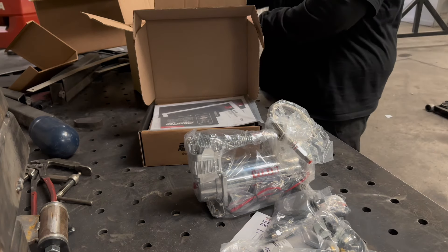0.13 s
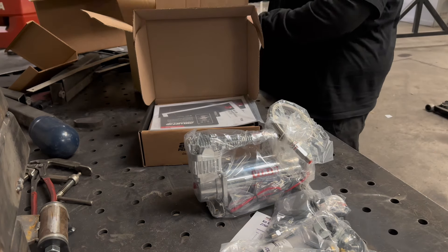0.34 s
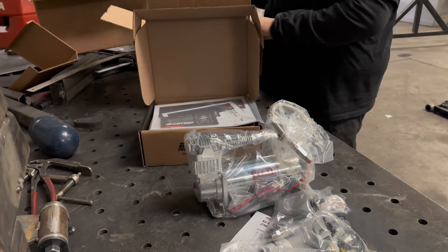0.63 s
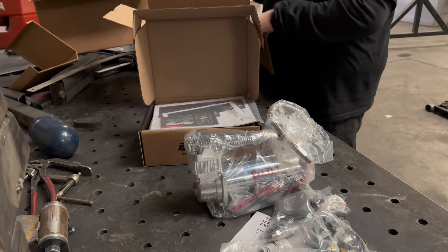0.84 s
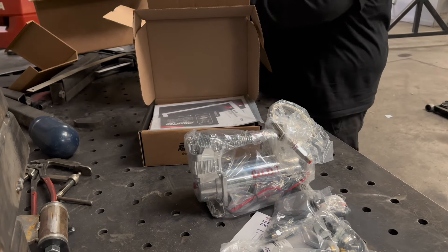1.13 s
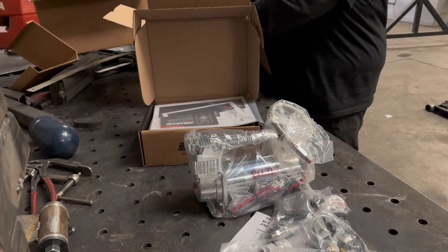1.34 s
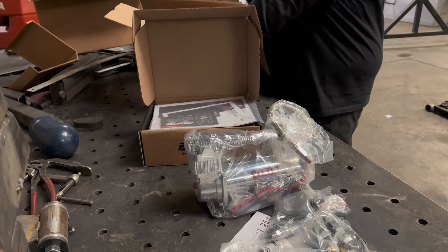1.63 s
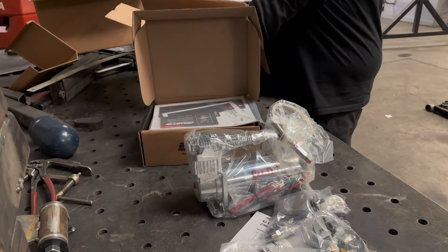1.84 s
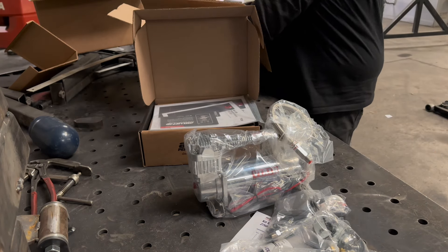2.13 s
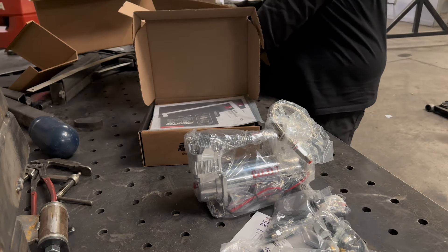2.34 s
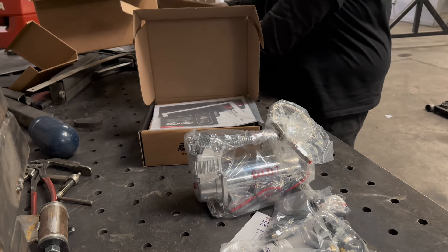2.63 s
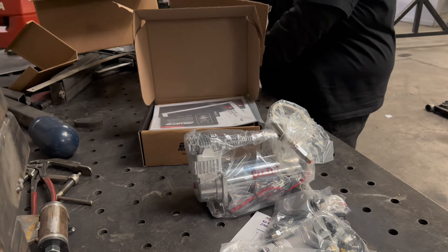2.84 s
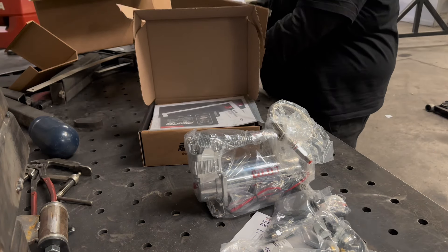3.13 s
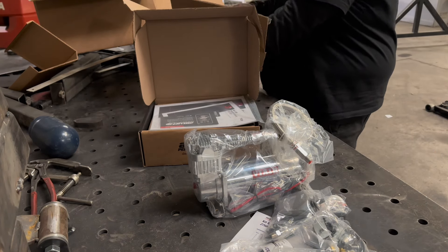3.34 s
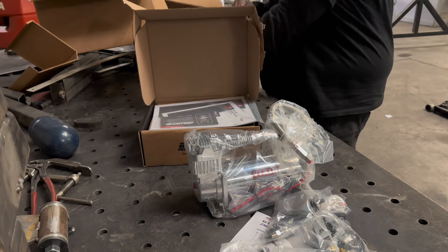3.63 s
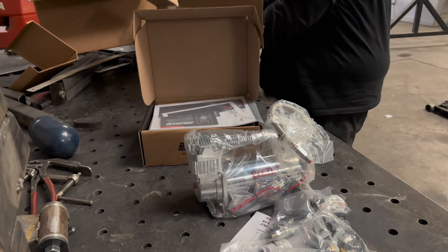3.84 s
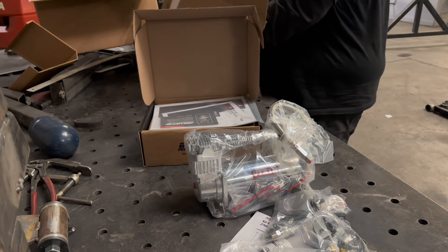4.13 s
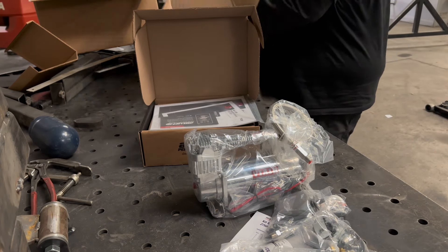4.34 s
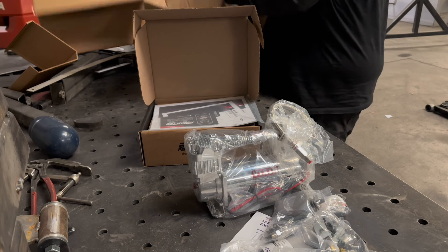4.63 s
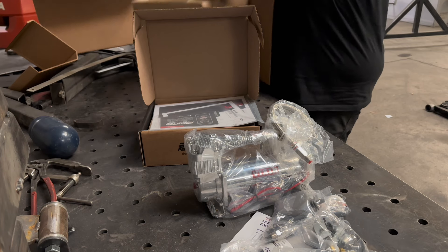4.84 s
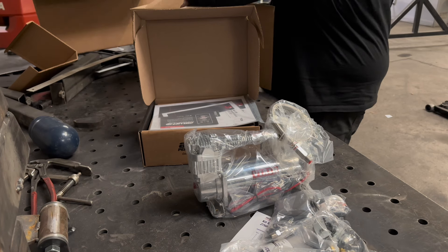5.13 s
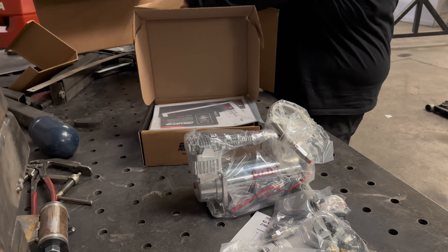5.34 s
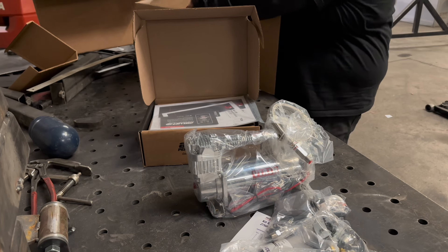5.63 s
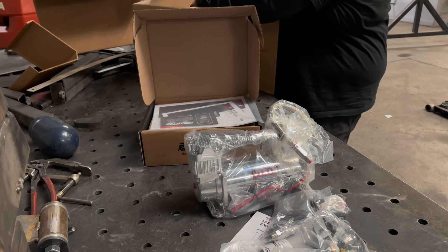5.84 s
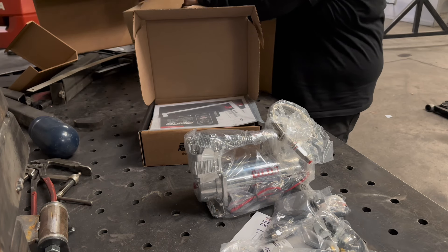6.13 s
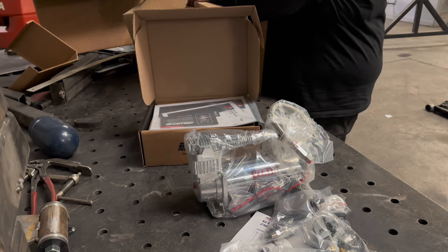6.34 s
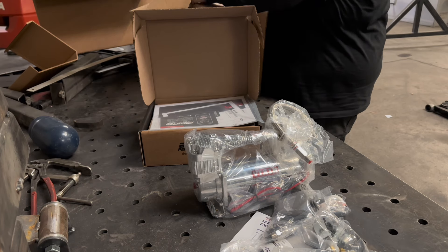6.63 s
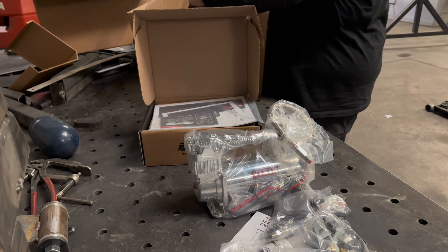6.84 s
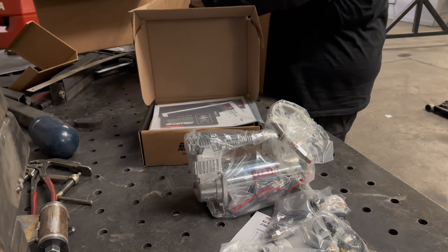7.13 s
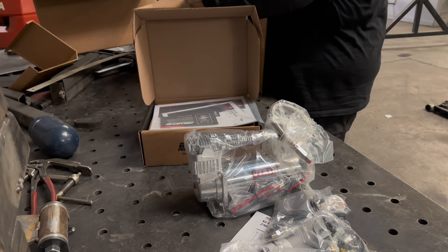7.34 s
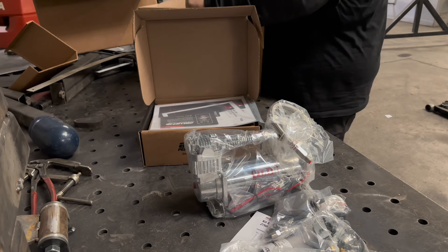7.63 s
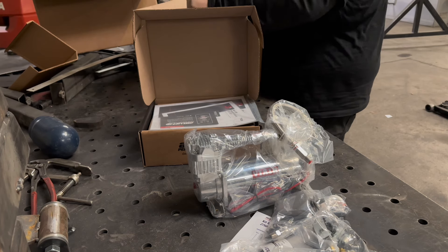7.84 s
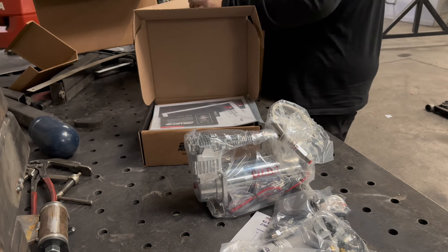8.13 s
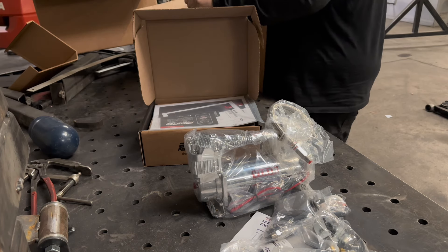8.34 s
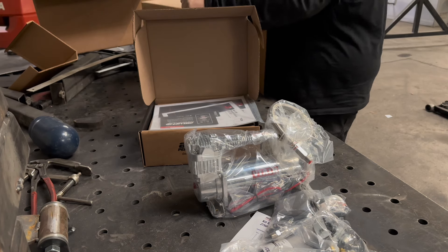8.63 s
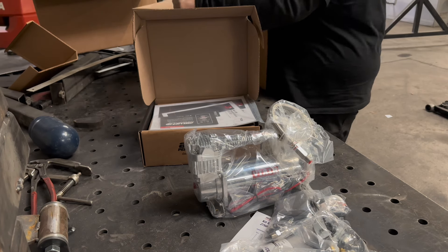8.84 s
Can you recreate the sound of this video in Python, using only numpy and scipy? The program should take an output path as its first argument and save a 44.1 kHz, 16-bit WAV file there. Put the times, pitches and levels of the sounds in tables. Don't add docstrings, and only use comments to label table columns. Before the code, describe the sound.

Cardboard cartons are knocked, rubbed and flexed while tape and creases snap and plastic film crackles, over a low steady hum in a large workshop.

```python
import sys
import numpy as np
from scipy import signal
from scipy.fft import rfft, irfft, next_fast_len
from scipy.io import wavfile
from scipy.ndimage import uniform_filter1d

SR = 44100
rng = np.random.default_rng(int(sys.argv[2]) if len(sys.argv) > 2 else 0)


def int16_out(signal):
    q = np.round(np.clip(np.atleast_2d(signal).T, -1, 1) * 32767)
    wavfile.write(sys.argv[1], SR, q.astype(np.int16))


def undo_db(level):
    steps = np.asarray(level, float) / 20
    return 10 ** steps


N = 396459

# [start_s, card_scrape_db, fade_20_db_s, film_over_card_db]
JERK_STROKES = [(0.009, -43, 0.08, 4), (.195, -40, 0.21, -0.5), (.454, -39, -0.08, -12), (.79, -63, 1, 4.5),
                (1.19, -43.5, 0.93, -6.5), (2.3, -28.5, 0.1567, -1), (2.439, -29, 0.12, 0.5),
                (3.24, -52, 0.5, -1.5), (4.166, -43.5, 0.5, -4.5), (3.639, -44, 0.13, -5.5),
                (2.0, -50, 1.5, -5), (4.522, -47, 0.5, 1.5), (4.665, -42.5, 0.2, -1),
                (4.895, -40.5, 0.25, -3.5), (5.205, -60.5, 0, 9.5), (5.377, -45.5, 1, -13),
                (5.934, -24, 0.02, 3.5), (5.978, -26.5, 0.06, -3), (6.114, -38.5, 0.18, 0),
                (6.32, -46, .8, -9.5), (6.8, -52, 0.2, -19), (7.2, -49, -3, -11), (7.235, -36, 0.26, -1),
                (7.824, -31.5, 0.29, -12), (8.247, -46.5, 1.3, -21)]
# [fastest_s, card_scrape_db, rise_20_db_s, fade_20_db_s, film_over_card_db]
SLIDE_STROKES = [(0.262, -39, 0.11, 0.04, -5.5), (.6, -45, .5, 0.24, 2.5), (.73, -49.5, 1.1, 0.04, -1),
                 (1.5, -48, 0.17, 0.4, 0), (1.78, -50, 0.16, 0.15, -1.2), (2.257, -40.5, 0.34, 0.48, -4.5),
                 (2.49, -23.5, 0.0161, 0.0855, -2.5), (2.74, -38, 0.29, 0.19, -5),
                 (3.118, -56, 0.2, 0.5, -7), (3.8, -45.5, 0.78, -0.34, -8), (3.961, -40, 0.29, 0.14, -7.5),
                 (4.41, -55, .4, 0.04, 8), (4.796, -44, -0.4, 0.16, -12), (5.285, -46.5, 0.08, 0.3, -4),
                 (5.657, -47, 0.14, 0.9, 0), (5.89, -52, 0.6, 0.1, 1), (6.212, -25.5, 0.0957, 0.07, -8),
                 (6.58, -45, 0.24, 0.22, 1), (7.355, -31, 0.066, 0.08, -12), (7.617, -31, 0.11, 0.2, -2.5),
                 (7.93, -33, 0.08, 0.15, -21), (8.03, -44, 0.06, 0.35, -27), (7.29, -33, 0.0651, 0.12, -4),
                 (7.09, -66.5, .05, 2, -6), (8.64, -47.5, 0.82, -1.5, 0), (8.75, -47, -0.1, .5, -3),
                 (8.932, -37.5, 0.15, 1.2, -7.5)]
# [strongest_s, level_db, rise_and_fade_20_db_s]
HEAVES_OF_PANELS = [(1.65, -37, 0.16), (3.5, -44.5, 0.9), (4.49, -41.5, 1.3), (7.53, -34, 0.43),
                    (8.8, -32, 0.44), (7.29, -22.5, 0.07), (3.28, -40.5, 0), (2.68, -40, -0.37),
                    (8.56, -38, 0.15), (8.74, -41, 1), (6.4, -46, 1), (5.58, -44, 1.5)]
# [pitch_hz, level_db]
FILM_COLOUR = [(1500, -11), (3000, -8), (5000, -6.5), (7000, -7.5), (9500, -5.5), (13000, -3),
               (16000, -9.5)]
# [pitch_hz, level_db]
CARD_COLOUR = [(350, -11.5), (800, -1.5), (1500, -2.5), (2600, -6.5), (4000, -16), (9000, -26.5)]
# [pitch_hz, level_db]
PANEL_COLOUR = [(60, -3.5), (110, 0.5), (200, 2.5), (400, 2.5), (700, -10), (1300, -21.5), (3000, -40)]


def rubbing():
    jerk_rise_s = 0.015
    moves = [(s, db, jerk_rise_s, fade_s, film_db) for s, db, fade_s, film_db in JERK_STROKES]
    moves = moves + list(SLIDE_STROKES)
    film_db = strokes([(s, db + over_db, rise_s, fade_s) for s, db, rise_s, fade_s, over_db in moves])
    card_db = strokes([(s, db, rise_s, fade_s) for s, db, rise_s, fade_s, _ in moves])

    # 5.5 dB under it, rising in 0.012 s and fading in 0.11 s
    shudders = []
    for table in (SMALL_KNOCKS, MIDDLE_KNOCKS, LARGE_KNOCKS):
        shudders += [(s + 0.0071, db - 5.5, 0.012, 0.11) for s, db, *_ in table]
    heaves = [(s, db, span_s, span_s) for s, db, span_s in HEAVES_OF_PANELS]
    shudder_db = strokes(shudders + heaves)
    rumble_db = -44 + 0.91 * (card_db + 49)
    panel_gain = np.hypot(undo_db(rumble_db), undo_db(shudder_db))

    film_slips = slips(per_s=300, spread_db=6.0, fade_s=0.027, bed=0.65)
    card_slips = slips(per_s=220, spread_db=4.0, fade_s=0.01, bed=0.8)
    panel_slips = slips(per_s=90, spread_db=2.5, fade_s=0.015, bed=0.9)
    film = evened(coloured(patchy(film_slips, db=3.0), FILM_COLOUR))
    card = evened(coloured(patchy(card_slips, db=2.5), CARD_COLOUR))
    panel = evened(coloured(panel_slips, PANEL_COLOUR))
    return undo_db(film_db + 4.5) * film + undo_db(card_db - 1.0) * card + undo_db(-3.5) * panel_gain * panel


def strokes(rows):
    t = np.arange(0, N, 64) / SR
    s, db, rise_s, fade_s = np.array(rows).T[:, :, None]
    away = np.where(t < s, (s - t) / abs(rise_s), (t - s) / abs(fade_s))
    power = undo_db(2 * (db - 20 * away)).sum(axis=0)
    return np.interp(np.arange(N) / SR, t, 10 * np.log10(power + 1e-9))


def slips(per_s, spread_db, fade_s, bed):
    happens = rng.random(N) < per_s / SR
    size = undo_db(spread_db * np.minimum(rng.exponential(1, N), 4)) * happens
    power = signal.lfilter([1], [1, -np.exp(-1 / (abs(fade_s) * SR))], size ** 2)
    return np.sqrt(abs(bed) + power / power.mean()) * rng.standard_normal((2, N))


def patchy(x, db):
    z = signal.stft(x, nperseg=256)[2]
    patches = uniform_filter1d(rng.standard_normal(z.shape[1:]), size=2, axis=0)
    patches = evened(uniform_filter1d(patches, size=10, axis=1))
    return signal.istft(z * undo_db(db * patches), nperseg=256)[1][:, :N]


# [start_s, peak_db, wall_pitch_hz, flap_over_peak_db]
SMALL_KNOCKS = [(.051, -30, 162, -12), (.437, -25, 450, -8), (1.254, -17, 404, -4),
                (1.32, -16.5, 438, -1.5), (1.44, -30, 421, -18), (1.468, -31, 172, -24),
                (1.979, -39, 295, -9), (5.633, -38.5, 148, 0), (5.923, -9.5, 383.6, -14),
                (5.981, -21, 393, -13), (6.118, -24, 154, -12), (8.343, -26.5, 261, -27)]
# [start_s, peak_db, wall_pitch_hz, flap_over_peak_db]
MIDDLE_KNOCKS = [(.004, -23.5, 324, -14), (.219, -23, 436, -41), (.254, -32.5, 394, -27.5),
                 (.393, -30.5, 318, -19), (.679, -35, 460, -35), (1.183, -15.5, 328, -11),
                 (1.206, -16, 296, -21), (1.726, -30.5, 294, -32), (2.304, -22, 410, 0),
                 (2.465, -26.5, 443, 9.5), (2.486, -22, 503, 3), (2.753, -36.5, 450, 1),
                 (3.362, -38.5, 457, -3.5), (3.772, -21.5, 340, -8.5), (5.27, -25, 346, -6.5),
                 (5.364, -21.5, 326, -12.5), (6.963, -39.5, 276, -21), (7.335, -14.5, 287, -10.5),
                 (8.242, -29.5, 404, -13.5), (8.868, -19.5, 293, -12), (8.902, -25, 338, -5),
                 (8.945, -26, 290, -12), (8.925, -22.5, 392, -5.5)]
# [start_s, peak_db, wall_pitch_hz, flap_over_peak_db]
LARGE_KNOCKS = [(1.769, -32.5, 142, -21), (2.278, -15.5, 228, -5.5), (2.509, -25, 178, -5),
                (3.093, -28.5, 220, -21.5), (3.926, -31.5, 244, -5), (4.611, -19.5, 196, -15),
                (4.73, -22, 219, -26), (4.767, -21.5, 244, -11.5), (4.89, -10, 202, -18.5),
                (4.954, -20.5, 253, -13), (4.987, -27.5, 139, -2.5), (6.16, -22, 160, -10),
                (6.191, -17.5, 180, -12), (6.205, -18.5, 160, -6.5), (7.009, -32.5, 218, -19),
                (7.05, -37, 194, -37), (7.228, -13, 201, -18), (7.575, -26.5, 218, -5.5),
                (7.621, -17.5, 198, -28), (7.817, -13, 238, -18.5), (7.839, -10.5, 223, -28),
                (8.766, -34, 302, -3)]
# [fade_60_db_s, flap_pitch_hz]
CARTON_RINGING = [
    (0.18, 916),
    (0.11, 576),
    (0.14, 627),
]


def knocks():
    mix = np.zeros((2, N))
    for table, (t60, flap_hz) in zip((SMALL_KNOCKS, MIDDLE_KNOCKS, LARGE_KNOCKS), CARTON_RINGING):
        for s, db, wall_hz, flap_db in table:
            add(mix, s, knock(db, wall_hz, t60, flap_hz, flap_db))
    return mix


def knock(db, wall_hz, t60, flap_hz, flap_db):
    t = np.arange(SR // 4) / SR
    t60 = np.clip(t60, 0.02, 0.5)
    rattle_fade = np.exp(-t / 0.0017) + 0.32 * undo_db(-60 * t / t60)
    rattle = rng.standard_normal((2, len(t))) * rattle_fade
    drive = np.exp(-t / 0.00065) + 0.5 * rattle
    bend = 1 - np.exp(-t / 0.0026)
    wall = panel_ring(drive, wall_hz, t60) * bend
    flap = panel_ring(drive, flap_hz, 0.6 * t60) * bend
    both = peaked(wall, db - 0.5) + peaked(flap, db + flap_db + 6.0)
    return np.pad(both, ((0, 0), (110, 0)))


# [pitch_ratio, level_db, damping_factor]
PANEL_MODES = [
    (1.004, 9, 1.5),
    (1.221, -5, 1.17),
    (0.826, 2.5, 2.6),
    (1.415, 0.5, 1.75),
]


def panel_ring(drive, hz, t60):
    width = 3.32 / t60 * (hz / 300) ** 0.67
    total = 0
    for ratio, db, damping in PANEL_MODES:
        total = total + undo_db(db) * resonate(drive, hz * ratio, width * damping) / damping
    return resonate(total, hz, 1.36 * hz)


# [start_s, peak_db, centre_hz]
SNAPS_OF_FILM = [(.258, -33.5, 1320), (0.524, -40, 1700), (2.9074, -43.5, 1200), (3.286, -46.5, 1700),
                 (4.186, -40.5, 2610), (4.219, -40.5, 1320), (6.839, -48, 1690), (8.793, -42, 1410),
                 (5.77, -41.5, 1900), (8.728, -48, 1500), (8.744, -44, 2300)]
# [start_s, peak_db, centre_hz]
SNAPS_OF_TAPE = [(1.183, -32.5, 1360), (1.256, -41, 1300), (2.2796, -17, 1350), (2.4419, -20, 1600),
                 (2.343, -23, 2200), (2.37, -25, 1360), (3.2366, -36.5, 3570), (3.9521, -30, 2640),
                 (4.246, -31, 3550), (4.7417, -33, 1200), (4.888, -25.5, 1280), (4.9877, -35, 1230),
                 (5.2656, -35.5, 1110), (5.3659, -33, 1790), (5.6362, -34, 1880), (5.9246, -8, 2570),
                 (5.9851, -17, 1230), (6.1177, -25, 1700), (6.155, -24.5, 2840), (6.186, -21.5, 2820),
                 (6.204, -22, 2300), (6.196, -19.5, 1100), (6.227, -20, 1300), (7.228, -15, 1600),
                 (7.3347, -16.5, 1340), (8.869, -29.5, 1320), (7.817, -31, 1300)]
# [start_s, peak_db, centre_hz]
SNAPS_OF_CARD = [(.198, -33, 1900), (0.4394, -28, 1740), (1.206, -40, 1180), (1.3223, -26, 1310),
                 (2.306, -10, 1620), (2.4327, -21, 2370), (2.462, -12, 1510), (2.489, -14, 900),
                 (2.495, -10.5, 1730), (2.509, -19, 1280), (3.3118, -32.5, 2130), (3.362, -29, 1770),
                 (3.778, -38, 1580), (4.771, -28.5, 1780), (6.8037, -30, 1800), (7.2478, -23, 1640),
                 (7.829, -25, 1100), (7.85, -25, 1490), (7.904, -26, 1200), (7.955, -33, 1390),
                 (7.881, -22.5, 1400), (8.2414, -30, 1490), (8.359, -27.5, 2350), (8.7195, -40, 1500),
                 (8.748, -36, 2300), (8.9025, -23, 1100), (8.927, -19, 1190)]
# [fade_60_db_s, tick_over_peak_db]
CREASE_KINDS = [
    (.045, 2.5),
    (.045, -10),
    (.045, -20.5),
]


def snaps():
    mix = np.zeros((2, N))
    for table, (t60, tick_db) in zip((SNAPS_OF_FILM, SNAPS_OF_TAPE, SNAPS_OF_CARD), CREASE_KINDS):
        for s, db, hz in table:
            add(mix, s, snap(db, hz, t60, tick_db))
    return mix


def snap(db, hz, t60, tick_db):
    t = np.arange(SR // 6) / SR
    tail = undo_db(-60 * t / np.clip(t60, 0.005, 0.2))
    crack, tick = rng.standard_normal((2, 2, len(t)))
    crack = crack * (np.exp(-t / 0.0027) + 0.55 * tail) * (1 - np.exp(-t / 0.00076))
    crack = resonate(crack, hz, 11.0 * hz)
    crease = evened(resonate(crack, hz, 0.9 * hz)) + 0.7 * evened(resonate(crack, hz, 0.14 * hz))
    tick = signal.lfilter([1, -2, 1], [1, -1.1, 0.4], tick)
    tick = tick * (np.exp(-t / 0.0024) + 0.3 * tail)
    return peaked(crease, db + 3.0) + peaked(tick, db + tick_db + 16)


# [start_s, peak_db, pitch_hz, fade_60_db_s]
CLEAR_RINGS = [(.441, -26, 954, 0.058), (.442, -23.5, 460, .08), (1.186, -22.5, 285, 0.27),
               (1.186, -15.5, 527, 0.11), (1.209, -13.5, 502, .11), (1.257, -14.5, 933, 0.049),
               (.223, -28, 450, .06), (3.773, -23, 480, 0.084), (2.279, -16, 500, .03),
               (6.804, -34, 1960, 0.021), (8.927, -25, 990, 0.032), (1.277, -16.5, 397, 0.075),
               (1.34, -26, 880, 0.23), (5.926, -14, 384, 0.053), (6.209, -16, 452, 0.056),
               (7.011, -37, 394, 0.15), (7.828, -22, 518, 0.031), (8.873, -23.5, 470, 0.038),
               (3.775, -28, 1670, 0.049), (5.368, -33, 1000, 0.07), (5.372, -21.5, 337, 0.35),
               (5.926, -13, 2660, 0.037), (7.87, -20, 399, 0.32), (8.87, -28, 656, 0.24)]


def rings():
    mix = np.zeros((2, N))
    for s, db, hz, t60 in CLEAR_RINGS:
        add(mix, s, ring(db, hz, t60))
    return mix


def ring(db, hz, t60):
    t = np.arange(SR // 4) / SR
    left, right = rng.standard_normal((2, len(t))) * np.exp(-t / 0.0019)
    both = np.array([left, 0.8 * left + 0.6 * right])
    jolt = resonate(both, hz, 0.8 * hz)
    return peaked(resonate(jolt, hz, 2.6 / np.clip(t60, 0.02, 0.5)), db)


# [start_s, peak_db, pitch_hz]
BENCH_THUDS = [(1.206, -33, 85), (4.743, -22.5, 94), (4.892, -17.5, 102.5), (5.301, -43, 72.6),
               (6.2, -37, 101), (7.378, -41, 67), (7.628, -32.5, 114), (7.668, -30, 59), (7.832, -21, 110),
               (8.929, -43, 107)]


def thuds():
    mix = np.zeros((2, N))
    for s, db, hz in BENCH_THUDS:
        add(mix, s, thud(db, hz))
    return mix


def thud(db, hz):
    t = np.arange(SR // 4) / SR
    wave = np.sin(2 * np.pi * hz * t) * t * np.exp(-t / 0.014)
    return peaked(np.ones((2, 1)) * wave, db - 4.0)


# [time_s, level_db]
DRAG_LEVEL = [
    (5.4, -73.5),
    (5.5, -61),
    (5.62, -50.5),
    (5.8, -44),
    (5.86, -55),
    (5.92, -75),
]
# [pitch_hz, width_hz, level_db]
FLUTE_MODES = [
    (1150, 260, -9),
    (1870, 130, 0),
    (2600, 110, -3),
    (3420, 200, -14),
]


def dragging():
    drive = slips(per_s=410, spread_db=3.0, fade_s=0.0018, bed=0.74)
    total = 0
    for hz, width_hz, db in FLUTE_MODES:
        tone = resonate(resonate(drive, hz, width_hz), hz, width_hz)
        total = total + undo_db(db) * evened(tone)
    s, db = np.transpose(DRAG_LEVEL)
    return evened(total) * undo_db(np.interp(np.arange(N) / SR, s, db, -120, -120))


# [pitch_hz, fade_60_db_s]
SHOP_ECHO = [(100, 0.67), (400, 0.26), (1500, 0.31), (5000, 0.59), (12000, 0.42)]


def shop(x):
    taps = np.zeros((2, SR // 2))
    at = np.arange(300, SR // 2 - 20, 20)
    at = at + rng.integers(0, 20, (2, len(at)))
    np.put_along_axis(taps, at, rng.choice([-1., 1.], at.shape), 1)
    hz, t, z = signal.stft(taps, SR, nperseg=256)
    fade = undo_db(-60 * t / read(SHOP_ECHO, hz)[:, None])
    tail = signal.istft(z * fade, SR, nperseg=256)[1]
    return signal.fftconvolve(x, tail / np.linalg.norm(tail[0]), axes=1)[:, :N]


# [pitch_hz, level_db]
AIR_COLOUR = [(15, -31), (25, -11), (70, 12.5), (100, 4.5), (150, -5), (458, -8.5), (836, -16), (1690, -20),
              (5080, -35), (8600, -31.5), (10000, -44), (13000, -50), (22000, -120)]
# [pitch_hz, width_hz, level_db]
HUM_TONES = [
    (119.5, 1.5, -50),
    (178, 6, -62),
]


def air():
    swell = uniform_filter1d(uniform_filter1d(rng.standard_normal(N), 6000), 6000)
    level_db = -47 + 0.25 * evened(swell)
    total = undo_db(level_db) * evened(coloured(rng.standard_normal((2, N)), AIR_COLOUR))
    t = np.arange(N) / SR
    for hz, width_hz, db in HUM_TONES:
        waver = evened(resonate(rng.standard_normal(N), hz, width_hz))
        total = total + undo_db(db) * (np.sin(2 * np.pi * hz * t) + 0.39 * waver)
    return total


def evened(x):
    return x / np.sqrt(np.mean(x ** 2) + 1e-20)


def peaked(x, db):
    return undo_db(db) * x / abs(x).max()


def read(points, hz):
    f, value = np.transpose(points)
    return np.interp(np.log(hz + 1), np.log(f + 1), value)


def coloured(x, points):
    length = x.shape[-1]
    size = next_fast_len(length)
    gain = undo_db(read(points, np.fft.rfftfreq(size, 1 / SR)))
    return irfft(rfft(x, size) * gain, size)[..., :length]


def resonate(x, hz, width_hz):
    r = np.exp(-np.pi * width_hz / SR)
    return 2 * signal.lfilter([1 - r], [1, -r * np.exp(2j * np.pi * hz / SR)], x).real


def add(mix, s, sound):
    part = mix[:, max(round(s * SR), 0):][:, :sound.shape[1]]
    part += sound[:, :part.shape[1]]


def scene():
    bed = rubbing() + dragging() + air()
    hits = knocks() + snaps() + thuds()
    echoes = undo_db(-3.5) * shop(hits)
    return hits + rings() + echoes + bed


def band_limit(x):
    return signal.sosfilt(signal.butter(12, 16980, fs=SR, output="sos"), x)


# [pitch_hz, level_db]
PORT_SUM = [(15, -44), (35, -10.5), (60, -1.5), (10000, -1.5), (13000, -4.5), (14500, -12.5), (15700, -0.5),
            (16000, -46), (17000, -83)]
# [pitch_hz, level_db]
PORT_CANCEL = [(10000, 0), (10400, -8), (10700, -28), (11700, -27), (12100, -20), (12500, -10), (13000, 0)]
# [pitch_hz, level_db]
PORT_DIFFERENCE = [(20, -57), (60, -20.5), (120, -16.5), (200, -14.5), (380, -11), (700, -2.5), (1300, -3),
                   (9000, -3), (11000, -7), (12200, -10), (13000, -17), (13600, -68)]
# [pitch_hz, level_db]
LEFT_LEAD = [(300, -7), (1000, -4), (3000, -7), (8000, -13), (10000, -5), (13000, -9), (13600, -56)]


def record(dry):
    dry = 0.9 * np.tanh(dry / 0.9)
    mid = coloured(coloured(dry[0] + dry[1], PORT_SUM), PORT_CANCEL) / 2 * undo_db(3.5)
    side = coloured(dry[0] - dry[1], PORT_DIFFERENCE) / 2 * undo_db(4.0)
    side = side + 0.092 * (mid - uniform_filter1d(mid, size=150))
    side = side + coloured(np.gradient(mid), LEFT_LEAD)
    return band_limit(np.array([mid + side, mid - side]))


dry = scene()
out = record(dry)
int16_out(out)
```